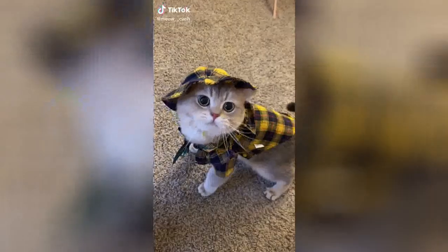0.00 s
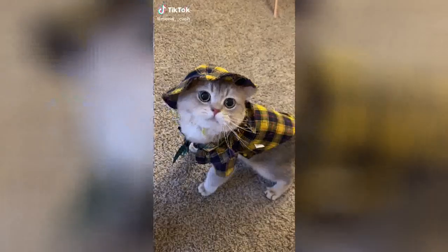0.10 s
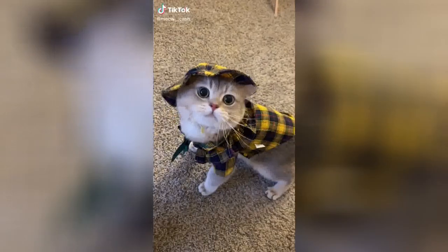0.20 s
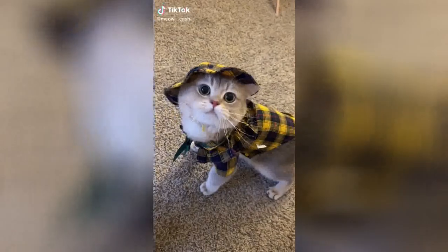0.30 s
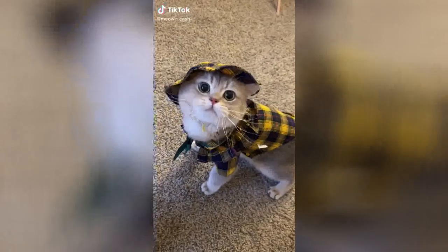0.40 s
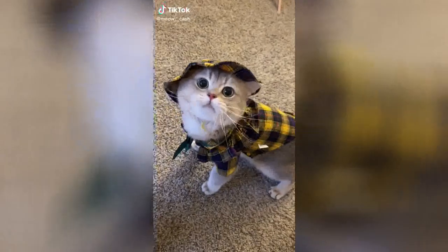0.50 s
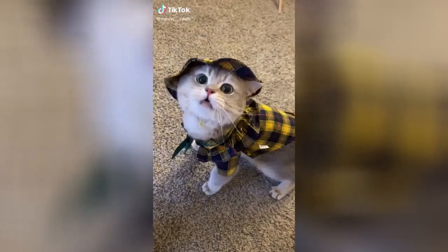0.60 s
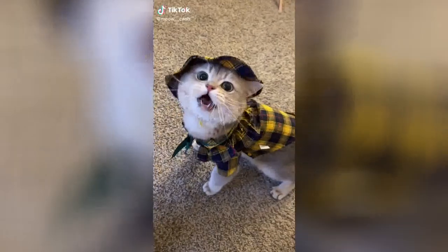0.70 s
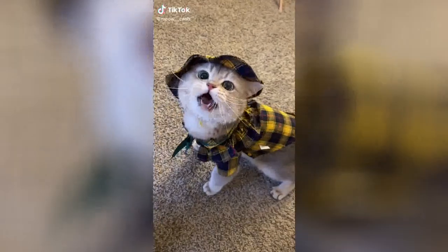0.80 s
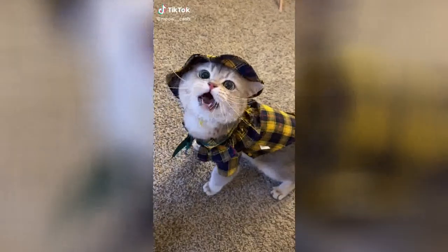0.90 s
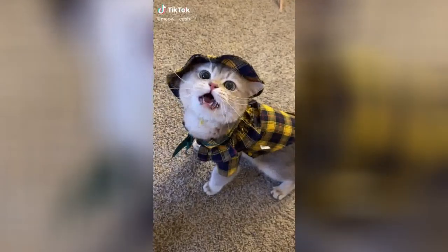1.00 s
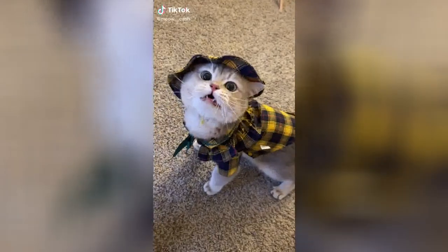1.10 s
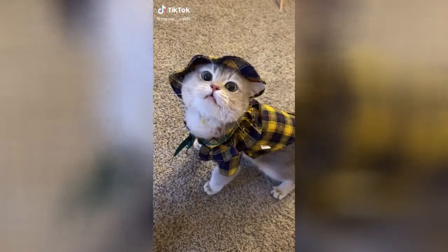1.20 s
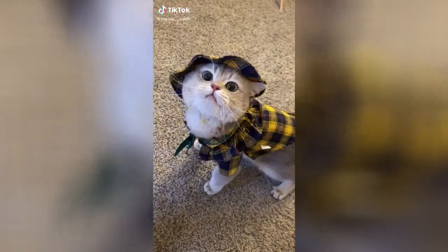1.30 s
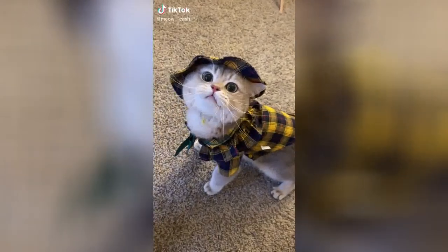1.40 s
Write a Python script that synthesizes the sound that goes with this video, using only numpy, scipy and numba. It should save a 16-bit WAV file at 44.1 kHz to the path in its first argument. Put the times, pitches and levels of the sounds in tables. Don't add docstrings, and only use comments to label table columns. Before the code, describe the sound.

A cat meows once, very close, in a small carpeted room with faint appliance hum. From 0 to 0.45 s a quiet, muffled closed-mouth trill flutters quickly at low pitch. It swells and rises, with tiny wet ticks near 0.5 s; the mouth opens at 0.59 s into a bright, smooth meow, peaking in pitch around 0.88 s, falling slightly, and closing near 1.06 s with a soft pop and short breath.

```python
import sys
import numpy as np
from scipy import signal
from scipy.fft import rfft, irfft, next_fast_len
from scipy.io import wavfile
from scipy.ndimage import uniform_filter1d
from numba import njit

SR = 44100
rng = np.random.default_rng(int(sys.argv[2]) if len(sys.argv) > 2 else 0)


def wav_record(signal):
    frames = np.transpose(np.atleast_2d(signal))
    bounded = np.clip(frames, -1, 1)
    quanta = np.round(bounded * 32767).astype(np.int16)
    wavfile.write(sys.argv[1], SR, quanta)


def decibels_to_gain(level_db):
    exponent = np.asarray(level_db, float) / 20
    return 10 ** exponent


N = 66150
TOP_HZ = 13000
LEFT_RIGHT = np.array([[1], [-1]])


def level(x, db):
    return x * decibels_to_gain(db) / np.sqrt(np.mean(x ** 2))


def curve(table, t, axis):
    return np.interp(t, np.array(table)[:, 0], np.array(table)[:, axis])


@njit
def moving_band(x, hz, width):
    y, band_state, low_state = np.empty(len(x)), 0., 0.
    for i in range(len(x)):
        g, k = np.tan(np.pi * hz[i] / SR), width / hz[i]
        v = (band_state + g * (x[i] - low_state)) / (1 + g * (g + k))
        band_state = 2 * v - band_state
        low_state = low_state + 2 * g * v
        y[i] = k * v
    return y


def band(x, hz, width):
    return moving_band(x, np.full(len(x), 1. * hz), 1. * width)


def double_band(x, hz, width):
    return band(band(x, hz, width), hz, width)


def butter(x, order, hz, kind):
    return signal.lfilter(*signal.butter(order, hz, kind, fs=SR), x)


def walk(rate):
    k = int(SR / rate)
    return level(uniform_filter1d(uniform_filter1d(rng.standard_normal(N), k), k), 0)


# (frequency [Hz], level [dB])
HUM_LINES = [
    (59.2, -52.5),
    (86.1, -50),
    (118.4, -44),
]
# (frequency [Hz], spectrum level [dB])
ROOM_AIR = [(18, -55), (30, -33.5), (49, 2.5), (124, -10.5), (152, -13.5), (342, -18.5), (1150, -48),
            (1870, -49.5), (12800, -64.5), (16700, -96), (22000, -120)]


def appliance(t):
    hum = sum(level(double_band(rng.standard_normal(N), hz, 9.8), db) for hz, db in HUM_LINES)
    f, points = np.arange(N // 2 + 1) * SR / N + 1, np.array(ROOM_AIR)
    shape = decibels_to_gain(np.interp(np.log(f), np.log(points[:, 0]), points[:, 1]))
    air = irfft(rfft(rng.standard_normal((2, N))) * shape, N)
    audible = irfft(rfft(air[0]) * (f > 150), N)
    air = air * decibels_to_gain(-49.5) / np.sqrt(np.mean(audible ** 2))

    fan_hz, fan_width_hz = 1900, 550
    edges = [fan_hz - fan_width_hz / 2, fan_hz + fan_width_hz / 2]
    fan = level(butter(rng.standard_normal(N), 3, edges, "band"), -67)
    side = decibels_to_gain(-6.5) * butter(air[1], 2, 250, "high")

    duck_db = -20 * (t > .72) * (t < 1.04)
    duck = 1 - decibels_to_gain(uniform_filter1d(duck_db, size=2000))
    upper = irfft(rfft(air[0] + fan) * (f > 430), N)
    return hum + fan + air[0] - duck * upper + side * (1 - duck) * LEFT_RIGHT


def room(x, t):
    t60_s, gap_s, damp_hz, room_db = 0.32, 0.018, 5000, -21
    tail = rng.standard_normal(N) * decibels_to_gain(-60 * t / t60_s) * (t > gap_s)
    tail = butter(tail, 1, damp_hz, "low")
    return decibels_to_gain(room_db) * signal.fftconvolve(x, tail / np.sqrt(np.sum(tail ** 2)))[:N]


TICK_TIMES = [.493, .585, 1.057, 1.057, .457, .606]
# (peak level [dB], ring frequency [Hz], ring time [s])
TICK_RINGS = [
    (-40.5, 6900, .008),
    (-34.5, 3600, 0.0064),
    (-23, 990, 0.0077),
    (-25.5, 460, 0.0095),
    (-28.5, 870, 0.014),
    (-48, 6300, .006),
]


def lips(t):
    out = 0
    for start_s, (db, hz, ring_s) in zip(TICK_TIMES, TICK_RINGS):
        u = np.maximum(t - start_s, 0)
        noise = level(double_band(rng.standard_normal(N), hz, hz / 2.6), 0)
        body = noise if hz > 3000 else np.sin(2 * np.pi * hz * u)
        swell = u / ring_s * np.exp(-u / ring_s * 2) * 2
        out = out + decibels_to_gain(db + 10.0) * swell * body
    return out


# (time [s], beats counted)
FLUTTER_BEATS = [(-.014, -1), (.134, 5), (.27, 10), (.391, 15), (.5147, 20), (.5595, 22), (.5935, 23),
                 (.6232, 24), (.72, 27)]
# (time [s], pitch [Hz])
VOICE_PITCH = [
    (0, 322.6),
    (.25, 324.4),
    (.43, 338.6),
    (.54, 360.6),
    (.65, 374.4),
    (.73, 402),
    (.88, 418.7),
    (.98, 412.9),
    (1.06, 383.1),
]
# (time [s], effort [dB], flutter depth [0-1])
VOICE_EFFORT = [(0, -28, .8), (.3, -24, 0.4), (.47, -18, 0.6), (.515, -15, .4), (.61, -11.5, 0.4),
                (.665, -15, 0.05), (.705, -14.5, 0.06), (.8, -17.5, 0), (1.045, -17, 0)]


def vocal_folds(t, mouth):
    sharp, bend, bend_lead_rad = 2.2, .19, -.4
    depth = np.clip(curve(VOICE_EFFORT, t, axis=2), 0, 1)
    turn = 2 * np.pi * curve(FLUTTER_BEATS, t, axis=1) + .3 * walk(20)
    sag = ((1 + np.cos(turn + bend_lead_rad)) / 2) ** sharp
    flutter = 1 - depth * ((1 + np.cos(turn)) / 2) ** sharp
    fold = np.exp(-np.maximum(t - 1.052, 0) / .005)

    glide = uniform_filter1d(curve(VOICE_PITCH, t, axis=1), size=3000, mode="nearest")
    jitter_shut, jitter_open = .007, .0011
    jitter = jitter_shut + (jitter_open - jitter_shut) * mouth
    hz = glide * (1 + jitter * walk(140) - bend * depth * (sag - sag.mean()))
    phase = 2 * np.pi * np.cumsum(hz) / SR
    k = np.arange(1, TOP_HZ // 330)[:, None]
    pulses = level((np.cos(k * phase) * k ** -0.084).sum(axis=0), 0)

    hiss = butter(rng.standard_normal(N), 3, 3300, "high")
    sigh_end = np.exp(-np.maximum(t - 1.09, 0) / .008)
    breath = hiss * (1 + fold * np.cos(phase)) * decibels_to_gain(curve(MOUTH_SHAPE, t, axis=2)) * sigh_end
    shimmer = decibels_to_gain(.5 * walk(40))
    return shimmer * (flutter * fold * pulses + np.sqrt(flutter) * breath)


# (time [s], opening [0-1], breath level against the pulses [dB])
MOUTH_SHAPE = [
    (0, 0.1, 21),
    (.45, 0.07, 20.5),
    (.578, 0.11, 15.5),
    (.587, 0.65, -0.5),
    (.67, 0.86, -4.5),
    (.72, 1.0, -15.5),
    (.99, 0.97, -15),
    (1.04, 0.75, -7.5),
    (1.08, 0.83, -4),
]
# (shut frequency [Hz], open frequency [Hz], width [Hz], shut level [dB], open level [dB])
RESONANCES = [(292, 494, 263, -4.5, -6.5), (644, 730, 377.6, -5, -1.5), (879.6, 1197, 129.3, 9.5, -22.5),
              (1401, 2037, 247, -23, 4), (2310, 2800, 870, -42.5, -8.5), (2450, 3127, 490, -44.5, -5),
              (4250, 4094, 410, -48, -18), (6160, 5400, 950, -73.5, -18.5), (7100, 6140, 500, -55.5, -13.5),
              (7500, 6660, 210, -64.5, -12), (7400, 7300, 170, -98.5, -7.5), (8400, 8350, 400, -82, -20),
              (9940, 9810, 200, -61, -37), (10824, 10700, 2900, -75.5, -33)]


def cat(t):
    mouth = np.clip(curve(MOUTH_SHAPE, t, axis=1), 0, 1)
    air = vocal_folds(t, mouth) + 1e-18
    voice = 0
    for n, (shut_hz, open_hz, width, shut_db, open_db) in enumerate(RESONANCES):
        centre = shut_hz + (open_hz - shut_hz) * mouth
        ring = moving_band(moving_band(air, centre, 1.52 * width), centre, 1.52 * width)
        gain = decibels_to_gain(shut_db + (open_db - shut_db) * mouth)
        voice = voice + (-1) ** n * gain * ring
    shut = np.clip((.3 - mouth) * 10, 0, 1)
    for _ in range(2):
        voice = voice - shut * band(voice, 5250, 1600)
    return decibels_to_gain(curve(VOICE_EFFORT, t, axis=1) + 11.5) * voice


# (frequency [Hz], left minus right level [dB], left phase lead [rad])
PORT_DIFFERENCE = [(152, -10, 0.1), (350, -1.5, .4), (520, -4.5, .4), (780, 12.5, 0.66), (1150, 13, 0.48),
                   (1720, 1.5, 0), (2100, -1.5, 0), (4000, -1.5, 0.79)]


def ports(x):
    size = next_fast_len(2 * N)
    f, points = np.log(np.arange(size // 2 + 1) * SR / size + 1), np.array(PORT_DIFFERENCE)
    db, lead = (np.interp(f, np.log(points[:, 0]), points[:, c]) for c in (1, 2))
    ratio = decibels_to_gain(db) * np.exp(1j * lead)
    left_right = np.array([2 * ratio / (1 + ratio), 2 / (1 + ratio)])
    return irfft(rfft(x, size) * left_right, size)[:, :N]


def scene():
    t = np.arange(N) / SR
    near = cat(t) + lips(t)
    side = decibels_to_gain(-4.5) * room(near, t) * LEFT_RIGHT
    return ports(near + room(near, t)) + side + appliance(t)


TREBLE_BANDS = [-2, -4, 0.5, -25, 1, 0.5, -3.5, -10, -18]


def rebuilt_top(x):
    mid_hz, top_hz, band_hz = 1033.6, 6546.1, 689.06
    noise_db, smooth_s = -11, 0.0054
    t, f, spec = np.arange(N) / SR, np.fft.fftfreq(N, 1 / SR), np.fft.fft(x)

    def below(hz):
        return np.clip((hz - np.abs(f)) / 120 + .5, 0, 1)

    def part(s, hz):
        return np.fft.ifft(2 * s * (below(hz + band_hz) - below(hz)) * (f > 0))

    def size(z):
        return np.sqrt(np.maximum(uniform_filter1d(np.abs(z) ** 2, int(smooth_s * SR)), 1e-16))

    noise = np.fft.fft(rng.standard_normal(x.shape))
    out = np.fft.ifft(spec * below(top_hz)).real
    for n, db in enumerate(TREBLE_BANDS):
        hz = top_hz + n * band_hz
        source_hz = mid_hz + n % 3 * band_hz
        copy = part(spec, source_hz) * np.exp(2j * np.pi * (hz - source_hz) * t)
        fill = part(noise, hz)
        mix = copy / size(copy) + decibels_to_gain(noise_db) * fill / size(fill)
        out = out + decibels_to_gain(db) * size(part(spec, hz)) * mix.real
    return out


def band_limit(x):
    return signal.sosfilt(signal.butter(12, 12970, fs=SR, output="sos"), x)


def record(dry):
    fade = np.clip((N - np.arange(N)) / (.004 * SR), 0, 1)
    top_cut = signal.ellip(8, .2, 70, TOP_HZ, fs=SR, output="sos")
    mix = signal.sosfilt(top_cut, rebuilt_top(dry * fade))
    return band_limit(mix)


dry = scene()
out = record(dry)
wav_record(out)
```